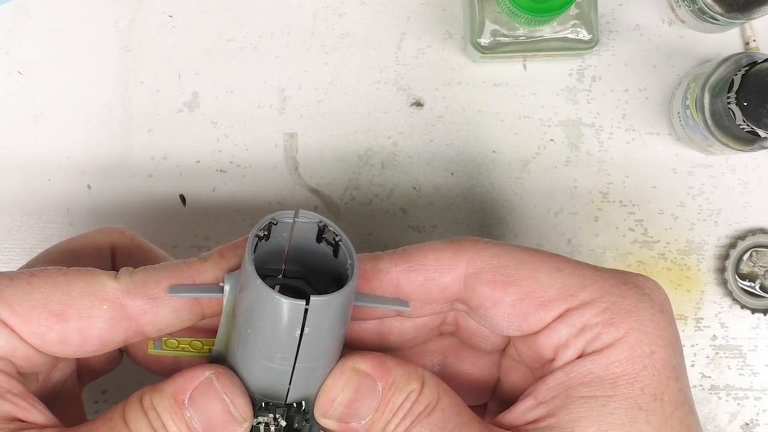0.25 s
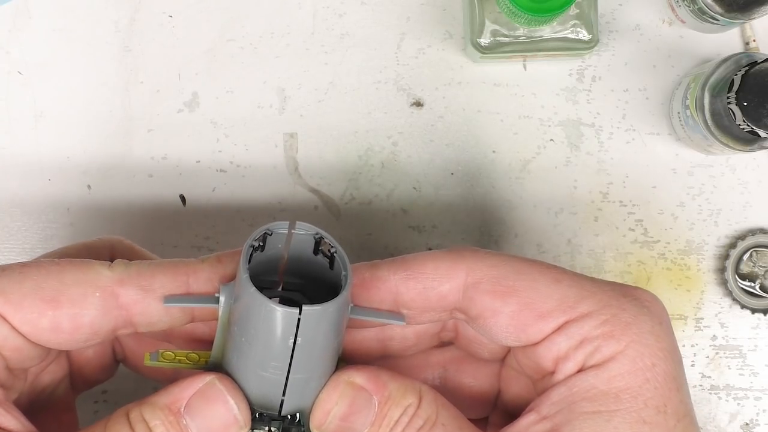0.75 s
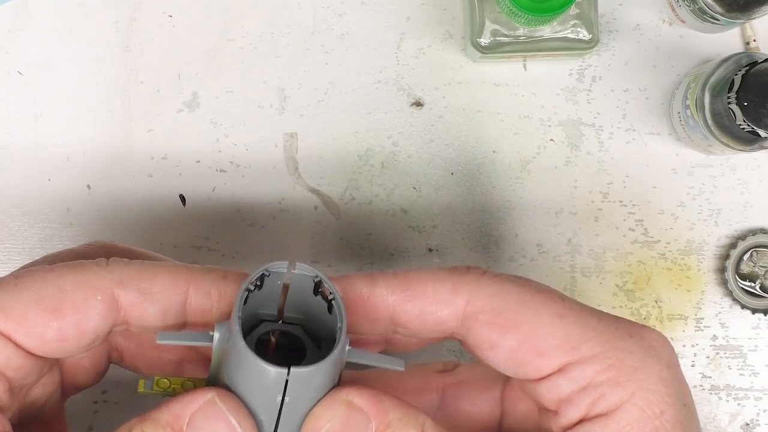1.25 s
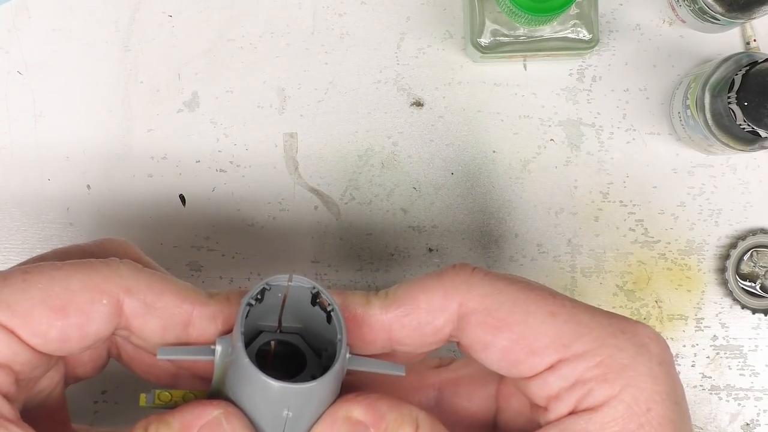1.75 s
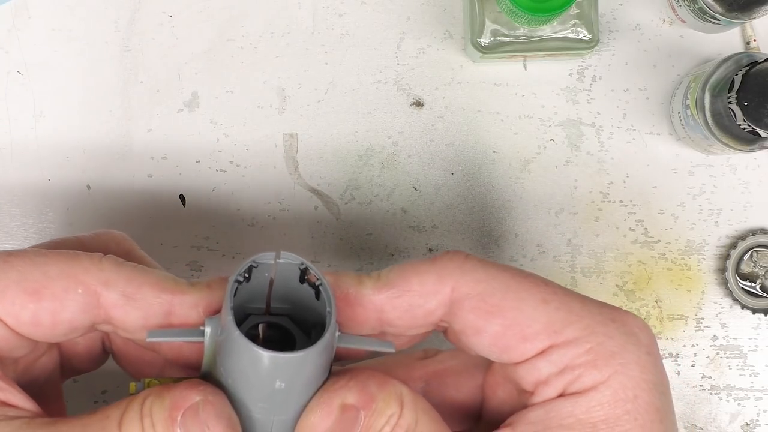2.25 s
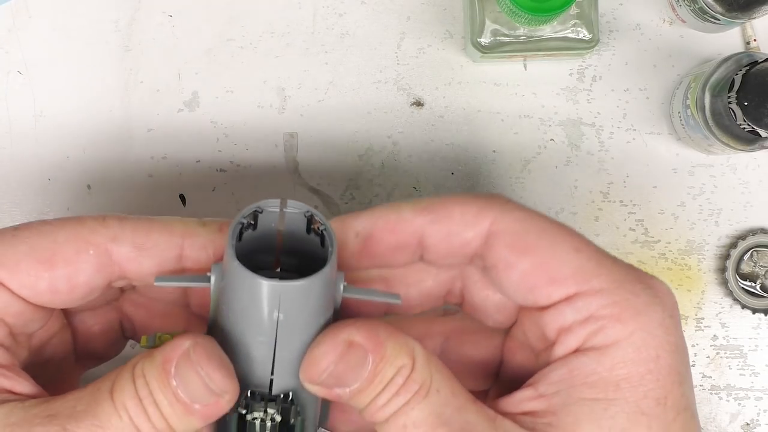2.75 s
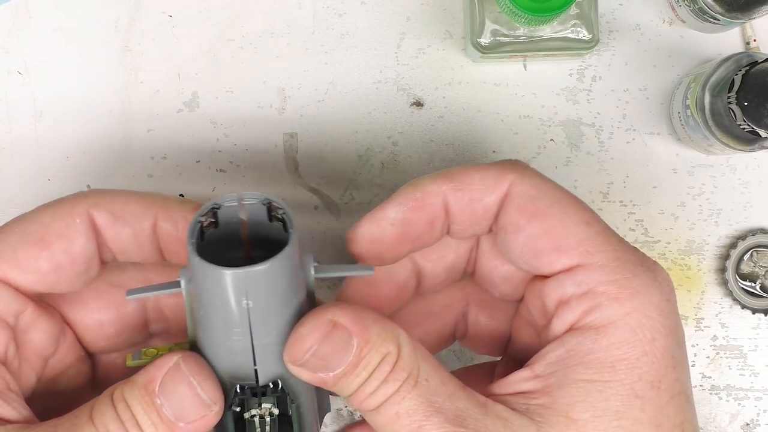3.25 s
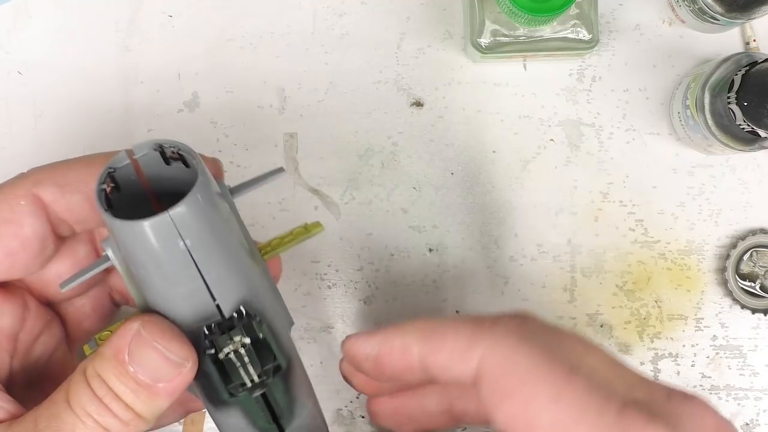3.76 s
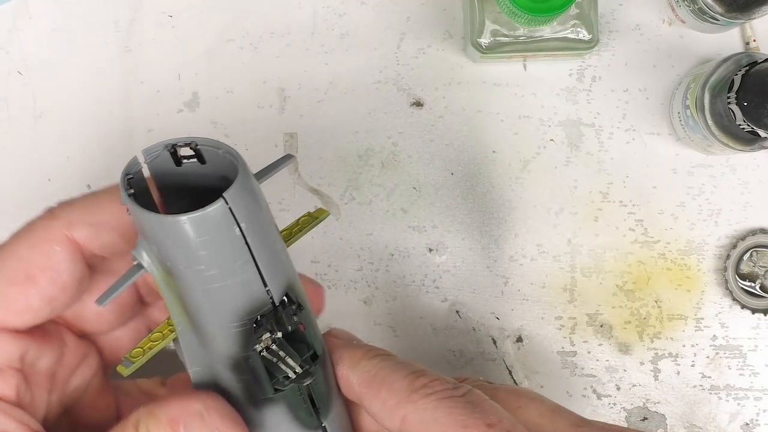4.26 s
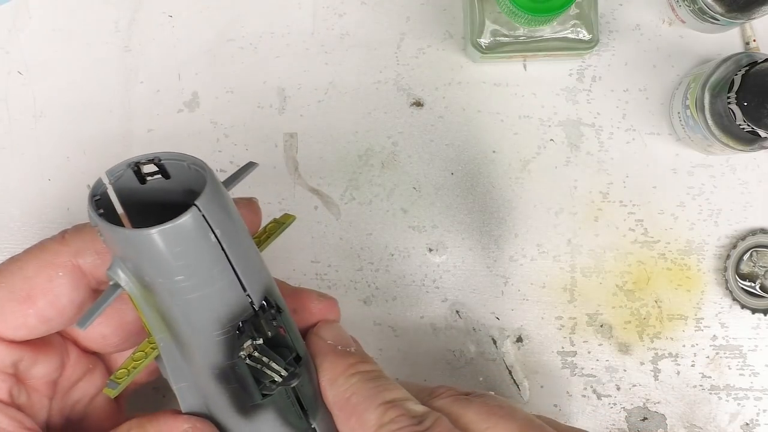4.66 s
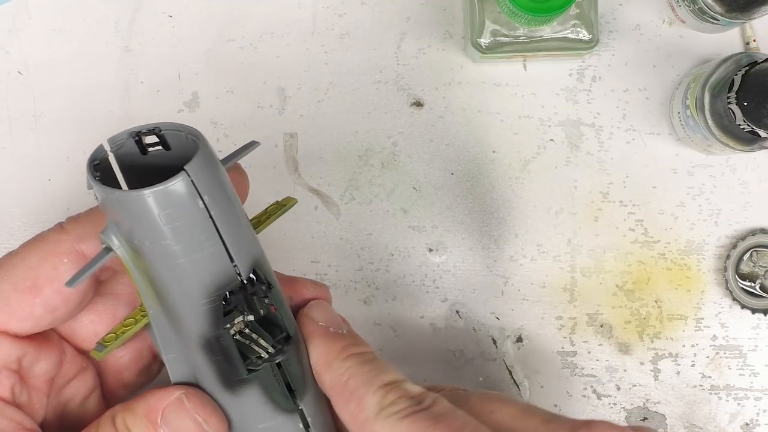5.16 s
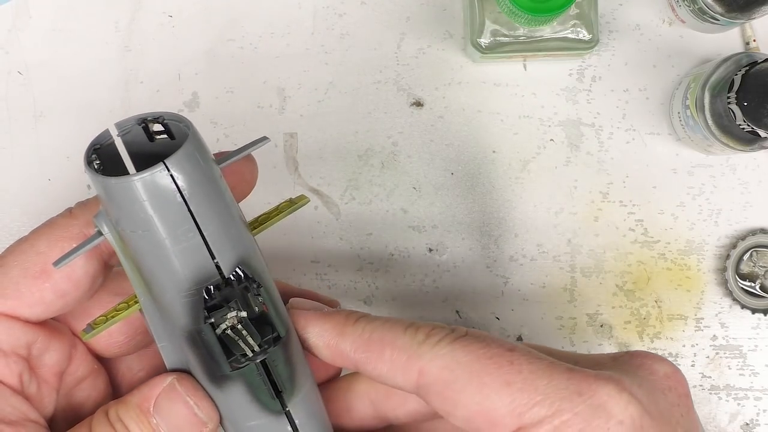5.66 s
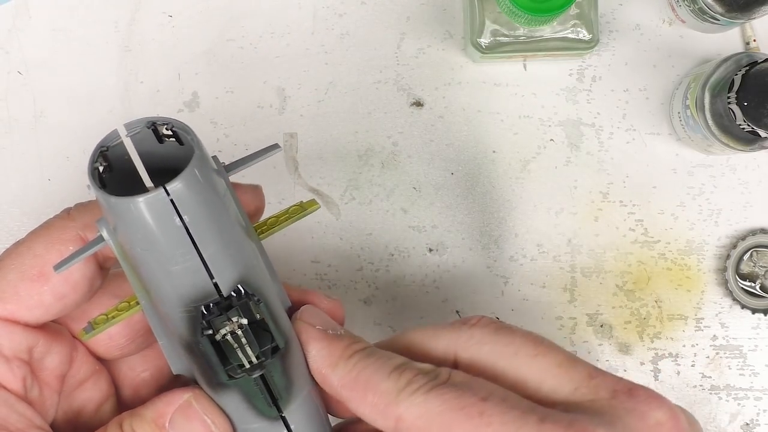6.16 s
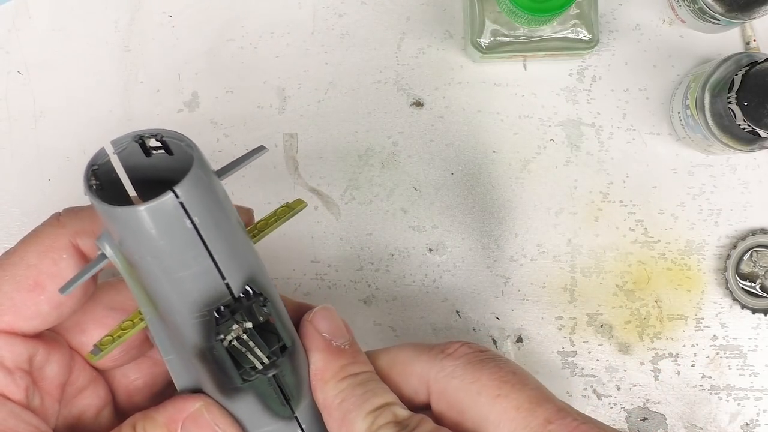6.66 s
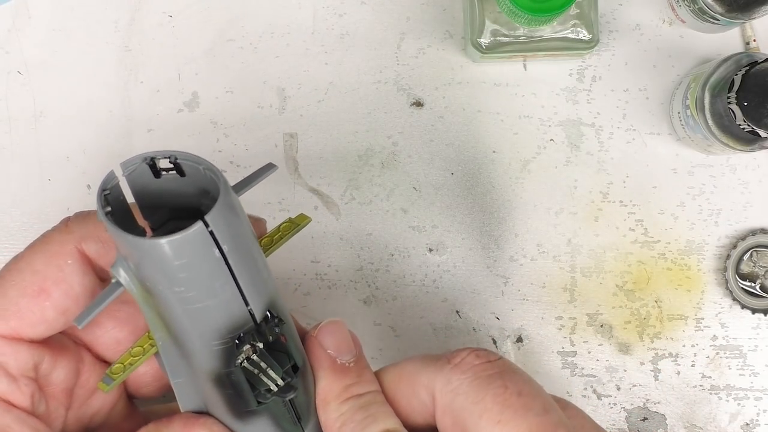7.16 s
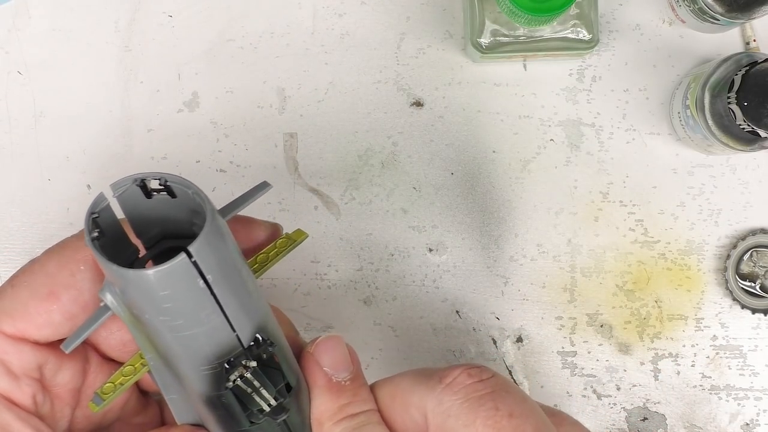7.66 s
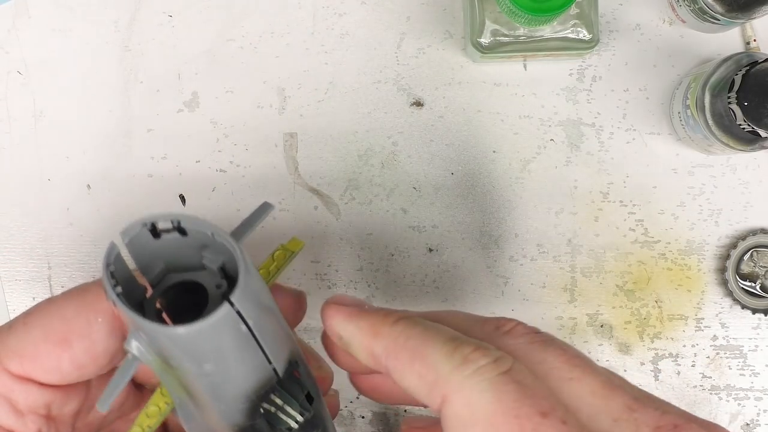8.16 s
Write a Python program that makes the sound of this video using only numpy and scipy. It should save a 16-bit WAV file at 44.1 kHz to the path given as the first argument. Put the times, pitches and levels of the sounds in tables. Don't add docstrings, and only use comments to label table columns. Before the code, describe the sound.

A hollow hard-plastic model shell is handled close to the microphone in a small, quiet room. From 0 to 1.4 seconds there are faint dry ticks and two short, breathy, grainy finger rubs around 0.95 and 1.2. A firm hollow snap lands at 1.5, a click at 1.9, then a quick cluster of ticks at 2.8-2.9. Light rubs and clicks follow around 3-3.5. At 4.2 a softer, brighter snap comes with two tiny high squeaks and skin friction. Sparse small ticks and faint rubs continue from 4.6 to 6.5. A weak snap at 6.9 precedes the loudest closing crack at 7.3, sharp and ringing with a short room tail. Clicks at 7.8-7.9 and a last rub at 8.4 end it. Behind runs a faint low hum, drifting tones, a thin whine, hiss and a distant rattling motor buzz that dips at 2.6 and 5.8 and fades briefly near 7.6.

```python
import sys
import numpy as np
from scipy import signal
from scipy.fft import rfft, irfft, next_fast_len
from scipy.io import wavfile
from scipy.ndimage import uniform_filter1d, map_coordinates

SR = 44100
rng = np.random.default_rng(int(sys.argv[2]) if len(sys.argv) > 2 else 0)


def unload_wav(signal):
    wavfile.write(
        sys.argv[1],
        SR,
        np.round(np.clip(np.atleast_2d(signal).T, -1, 1) * 32767).astype(np.int16),
    )


def linear_from_db(decibels):
    return 10 ** (np.asarray(decibels, float) / 20)


N = 370881
TIME_S = np.arange(N) / SR

# f/Hz, density/dB per Hz
SPREAD = [
    [(590, -46), (1000, -16), (1230, -13), (1300, -22), (1490, -8), (1780, -25), (1950, 1.5), (2650, -3),
     (3200, -4.5), (3810, -11), (5350, -9), (15000, -19)],
    [(500, -40), (900, -4), (2000, -1), (3700, -4), (5000, -16), (9000, -22), (15000, -20)],
    [(900, -28), (2600, 2), (4500, -9), (15000, -20)],
    [(470, -66), (800, -43), (998, -17), (1130, -14), (1290, -16), (1820, 0), (1980, -9.5), (2350, -3.5),
     (3010, -12.5), (4290, -10.5), (4850, -15.5), (8330, -16), (15000, -42)],
]


def unit(x):
    return x / np.sqrt(np.mean(x ** 2) + 1e-20)


def along(points, hz):
    f, v = np.transpose(points)
    return np.interp(np.log(hz + 1), np.log(f + 1), v)


def wobble(rate_hz):
    knots = rng.standard_normal(int(N * rate_hz / SR) + 4)
    return map_coordinates(knots, [np.arange(N) * rate_hz / SR])


def filtered(x, response):
    size = x.shape[-1]
    m = next_fast_len(size + 2048)
    return irfft(rfft(x, m) * response(np.fft.rfftfreq(m, 1 / SR)), m)[..., :size]


def coloured(spectrum, size=N):
    return unit(filtered(rng.standard_normal(size), lambda hz: linear_from_db(along(spectrum, hz))))


def wide(spectrum):
    # f/Hz, left-right correlation
    alike = [(30, .2), (60, 0.9), (110, 0.82), (290, 0.33), (640, 0.88), (1400, 0.22), (3100, 0.42),
             (5000, 0.24), (6900, 0.79), (9600, 0.72), (15000, 0.21)]

    def mid_side(hz):
        turn = np.arccos(np.clip(along(alike, hz), -1, 1)) / 2
        return linear_from_db(along(spectrum, hz)) * [np.cos(turn), np.sin(turn)]

    mid, side = filtered(rng.standard_normal((2, N)), mid_side)
    return unit(np.array([mid + side, mid - side]))


def add(track, s, sound, pan_db):
    part = track[:, max(round(s * SR), 0):][:, :len(sound)]
    part += linear_from_db([[pan_db / 2], [-pan_db / 2]]) * sound[:part.shape[1]]


def hiss():
    # f/Hz, density/dB per Hz
    hiss_spectrum = [(470, -51), (800, -14), (1100, -5), (1400, -6.5), (1700, -9), (2400, -9.5),
                     (3700, -14), (4700, -19.5), (6500, -28), (8000, -24.5), (11800, -18), (15600, -19.5)]
    return linear_from_db(-67 + 4.0) * wide(hiss_spectrum)


def whine():
    return linear_from_db(-83) * np.sin(2 * np.pi * 15704 * TIME_S)


def air_swell_db():
    # t/s, level/dB
    air = [(0.0, -62), (0.33, -59.5), (0.91, -62), (1.19, -61.5), (1.73, -60), (1.99, -63.5), (2.81, -61.5),
           (3.09, -62.5), (3.49, -61), (3.63, -63.5), (5.32, -61.5), (5.72, -62), (6.21, -64),
           (6.32, -63.5), (7.94, -60.5), (8.41, -55.5)]
    s, db = np.transpose(air)
    return np.interp(TIME_S, s, db) - np.mean(db)


def hum(swell_db):
    # f/Hz, density/dB per Hz
    hum_spectrum = [(25, -20.5), (60, -16.5), (82, -13), (100, -3), (120, -1.5), (145, -13.5), (180, -46)]
    level_db = -59.5 + 0.69 * swell_db - 0.5 * wobble(2.08)
    return linear_from_db(level_db) * wide(hum_spectrum)


def drone(swell_db):
    # f/Hz, density/dB per Hz
    drone_spectrum = [(88, -44), (150, -6.5), (221, -4), (252, -3), (338, -9.5), (406, -9.5), (445, -12),
                      (482, -7.5), (518, -18), (648, -22), (710, -12.5), (778, -19.5), (1700, -21),
                      (2210, -36), (3740, -120)]
    settle_s = 1
    early_db = 2 * np.exp(-(TIME_S / settle_s) ** 2)
    return linear_from_db(-62.5 + early_db + 0.84 * swell_db) * wide(drone_spectrum)


def far_tones():
    # start/s, end/s, f/Hz, level/dB
    tones = [(.2, 1.35, 238, -66.5), (0, 0.9, 400, -76), (0, 1.1, 499, -72), (.1, 1.1, 680, -79),
             (1.8, 8, 689, -86.5), (3, 7.2, 256, -72), (4.8, 7.2, 480, -75), (7.25, 8.15, 255, -64.5),
             (7.3, 8.7, 485, -71), (7.5, 9, 552, -76), (2.9, 4.04, 1325, -80), (5.7, 6.3, 1330, -79),
             (2.95, 3.4, 3600, -77), (8.1, 8.7, 256, -65)]
    out = np.zeros((2, N))
    sway = wobble(6.5)
    for start, end, hz, db in tones:
        t = np.arange(min(round((end - start) * SR), N)) / SR
        waver, swell = (np.roll(sway, rng.integers(N))[:len(t)] for _ in range(2))
        rise_s = t + 0.079 * (start == 0)
        fade = np.clip(np.minimum(rise_s, end - start - t) / 0.2, 0, 1)
        tone = np.sin(2 * np.pi * hz * t + 1.32 * waver)
        add(out, start, linear_from_db(db + 2.5 + 2.3 * swell) * fade * tone, pan_db=rng.uniform(-2.3, 4.3))
    return out


def buzz_level_db():
    # deepest/s, depth/dB, fall/s, recovery/s
    cut_outs = [
        (.85, 10, .03, .03),
        (2.64, 20, 0.021, 0.26),
        (5.8, 7, 0.025, 0.54),
        (7.6, 30, .28, 0.13),
    ]
    level_db = np.full(N, -64.5)
    for s, depth_db, fall_s, back_s in cut_outs:
        fall = np.clip(1 - (s - TIME_S) / fall_s, 0, 1)
        recovery = np.exp(-np.maximum(TIME_S - s, 0) / back_s)
        level_db -= depth_db * fall * recovery
    return level_db


def motor():
    # f/Hz, level/dB
    orders_db = [(1890, -6), (1949, 0), (2008, -1), (2067, -8), (2126, -5), (2186, -6), (2245, -5),
                 (2369, -10)]
    # f/Hz, density/dB per Hz
    casing = [(1600, -24.5), (1880, 1.5), (1970, 0.5), (2250, -2.5), (2400, -18), (2700, -32)]
    t = TIME_S + .00003 * wobble(4)
    orders = sum(linear_from_db(db) * np.exp(2j * np.pi * (hz * t + rng.random())) for hz, db in orders_db)
    orders = np.array([orders.real, (orders * np.exp(.9j)).real])
    return linear_from_db(buzz_level_db()) * unit(1.47 * unit(orders) + wide(casing))


def background():
    swell_db = air_swell_db()
    return hiss() + whine() + hum(swell_db) + drone(swell_db) + far_tones() + motor()


def room(x, wet_db):
    # f/Hz, t60/s
    decay = [(500, 0.38), (2000, 0.69), (5000, 0.49), (12000, 0.29)]
    size = SR // 2
    hz, t, z = signal.stft(rng.standard_normal((5, 2, size)), SR, nperseg=256)
    z = z * linear_from_db(-60 * t / along(decay, hz)[:, None])
    tails = signal.istft(z, SR, nperseg=256)[1][..., :size]
    tails = tails + .5 * tails[:, ::-1]
    tails = tails * np.clip(np.arange(size) / SR / 0.026 - .35, 0, 1)
    turn = np.arange(N) // (SR // 4) % len(tails)
    wet = np.zeros((2, N))
    for k, tail in enumerate(tails):
        part = (x * (turn == k))[None]
        wet += signal.fftconvolve(part, tail / np.linalg.norm(tail[0]), axes=1)[:, :N]
    return linear_from_db(wet_db) * wet


def rubs():
    # strongest/s, skin hiss/dB, rise/s, fall/s, shell modes over skin/dB
    strokes = [(0.948, -50.5, 0.028, 0.074, -6.5), (1.06, -75.5, 0.17, 0.33, 9.5),
               (1.189, -51, .018, 0.058, -3), (1.214, -66.5, 0.041, 0.04, -10.5),
               (3.02, -64, .035, .03, -2.5), (3.382, -60, 0.029, 0.014, -1), (3.544, -69, .022, .04, 0),
               (4.056, -68.5, 0.14, .08, 1.5), (4.168, -65, 0.027, 0.013, 11),
               (4.203, -66.5, 0.014, 0.029, 16), (4.307, -59.5, 0.1, 0.094, -2.5),
               (4.484, -72, .09, 0.27, 3), (4.562, -62, 0.17, 0.017, -9), (5.05, -69, 0.23, 0.17, 4.5),
               (5.208, -77, .045, 0.25, 4), (5.93, -72.5, 0.17, .2, 1.5), (6.056, -69, .03, 0.051, -3),
               (6.138, -73.5, 0.089, 0.1, 10), (6.98, -69.5, 0.13, 0.13, 5.5),
               (7.165, -75, 0.038, 0.032, 8), (7.905, -77.5, .012, 0.085, 11), (7.955, -67, 0.26, .07, -.6),
               (8.396, -54.5, 0.027, .04, -3.5)]
    # f/Hz, density/dB per Hz
    skin_hiss = [(4000, -17), (5500, -8.5), (8000, -5), (11000, -4), (13500, -12.5)]
    fine_hiss = [(10000, -44), (12000, -1), (16000, -7)]
    # f/Hz, density/dB per Hz
    low_mode = [(1200, -31), (1900, -3), (2450, -4), (2620, 3.5), (2800, -7), (3400, -13.5), (4000, -38)]
    high_mode = [(3000, -42), (3600, 1), (4000, -19.5), (4300, -6), (4600, -10.5), (5600, -22), (7000, -41)]
    # f/Hz, density/dB per Hz
    open_mode = [(1500, -27), (1950, -2.5), (2300, -7), (3500, -12), (3900, -3), (4080, -10), (4300, -1),
                 (5000, -20.5)]
    span_db = 20
    hold = 0.13
    closed_s = 1.3

    skin, hollow = np.zeros((2, N))
    for s, db, rise_s, fall_s, shell_db in strokes:
        before = (s - TIME_S) / rise_s
        after = np.maximum((TIME_S - s) / fall_s - hold, 0)
        stroke = linear_from_db(db - span_db * np.maximum(before, after))
        skin = skin + stroke
        hollow = hollow + linear_from_db(shell_db) * stroke
    shut = hollow * np.where(TIME_S < closed_s, .3, 1)
    layers = [(skin, skin_hiss), (linear_from_db(-9) * skin, fine_hiss),
              (shut, low_mode), (linear_from_db(-4.5) * shut, high_mode),
              (linear_from_db(5) * (hollow - shut), open_mode)]
    grain = linear_from_db(2.8 * wobble(1200) + 2.2 * wobble(60))
    rub = sum(level * unit(grain * coloured(colour)) for level, colour in layers)
    return rub * linear_from_db([[.6], [-.6]])


def squeaks():
    # t/s, length/s, f/Hz, level/dB
    chirps = [
        (3.298, .03, 6400, -69),
        (4.182, 0.031, 7550, -49),
        (4.208, 0.022, 7620, -47),
        (5.067, .05, 11800, -68),
        (7.165, .03, 11800, -68),
    ]
    out = np.zeros((2, N))
    for s, length_s, hz, db in chirps:
        t = np.arange(-length_s * SR, length_s * SR) / SR
        waver = uniform_filter1d(rng.standard_normal(SR // 4), size=60)[:len(t)]
        phase = 2 * np.pi * np.cumsum(hz * (1 + 0.12 * waver)) / SR
        swell = np.exp(-(2 * t / length_s) ** 2)
        add(out, s - length_s, linear_from_db(db) * swell * np.sin(phase), pan_db=1)
    return out


def slip(shell, bright_db, dull_db, damping):
    # f/Hz, density/dB per Hz
    crack = [(200, -38), (900, -20), (1500, -4.5), (2500, -1.5), (4200, -10.5), (6000, -40)]
    edge = [(4000, -20.5), (5500, -5), (8000, -2), (11000, -4), (15500, -15)]
    t = np.arange(SR // 25) / SR
    ring = np.zeros(len(t))
    for k, (hz, width_hz, db) in enumerate(shell):
        mode = np.sin(2 * np.pi * hz * t + 0.22 * k * k)
        ring += (-1) ** k * linear_from_db(db - damping * width_hz * t) * mode
    dull = linear_from_db(dull_db - 60 * t / 0.046) * coloured(crack, size=len(t))
    bright = 0.65 * linear_from_db(bright_db - 60 * t / 0.028) * coloured(edge, size=len(t))
    onset = 1 - np.exp(-t / 0.00046)
    return (ring / np.max(np.abs(ring)) + dull + bright) * onset


def room_blow(blow, colour):
    return filtered(blow, lambda hz: linear_from_db(along(colour, hz)))


def ticks():
    # t/s, peak/dB, brightness/dB, shell pitch f/Hz
    small_slips = [(0.0692, -49, -22, 1950), (0.53, -50.5, -9, 2090), (0.7007, -52.5, -3, 2000),
                   (0.869, -41, -10.5, 1950), (0.8994, -46.5, -21, 1950), (1.044, -47, -4, 2120),
                   (1.18, -44, -23, 4340), (1.365, -46.5, -9, 1950), (1.9119, -38, -13, 1950),
                   (2.2308, -65, -27, 1940), (2.772, -40, -13, 1990), (2.805, -49, -6, 2010),
                   (2.823, -53, -1, 1970), (2.8634, -44, -4, 1900), (2.892, -37.5, -8, 2020),
                   (2.954, -52, -20, 2350), (3.4261, -47.5, -9, 2110), (3.4449, -42.5, -24, 2000),
                   (3.4984, -48.5, -19, 2050), (4.6494, -51.5, -6, 1960), (4.9896, -46.5, -11, 2090),
                   (5.388, -45, -9.5, 2000), (5.6888, -49, -18, 1960), (5.7632, -46, -13, 1970),
                   (5.9383, -53, -3, 1900), (6.0546, -49.5, -1.5, 2180), (6.4433, -45, -18, 1800),
                   (7.7673, -41.5, -8.5, 1450), (7.8846, -37.5, -4, 1720), (7.9344, -53, -20, 1840)]
    near, blow = np.zeros((2, N)), np.zeros(N)
    for s, db, bright_db, hz in small_slips:
        shell = [(hz, 110, 0),
                 (hz * rng.uniform(1.3, 1.36), 200, -3),
                 (rng.uniform(3660, 4870), 200, -7)]
        for late_s, step_db in [(-.003, -14), (-.0005, -0.5), (.004, -8.5)]:
            click = slip(shell, bright_db, dull_db=-12.0, damping=24)
            add(near, s + late_s, linear_from_db(db + step_db) * click, pan_db=2.5)
        blow[round(s * SR)] = linear_from_db(db + 29.5)
    return near, room_blow(blow, SPREAD[-1])


def snaps():
    # brightness/dB, dull crack/dB, room send/dB
    mixes = [
        (-10, -17.5, -17.5),
        (-13.5, -11, -27),
        (-8.5, -11.5, -40),
        (-13, -19, -5.5),
    ]
    # f/Hz, width/Hz, level/dB
    shells = [
        [(2000, 120, -5.5), (2475, 180, -5), (2674, 48, -5), (2960, 130, -4.5), (4300, 260, -4.5),
         (5230, 120, -17), (6680, 110, -22)],
        [(447, 63, -21), (1044, 62, -10), (1270, 110, -2.5), (1950, 130, 3), (2600, 110, 6), (2960, 120, -19),
         (3500, 230, 3), (4660, 140, 1.5), (4950, 120, -5)],
        [(1870, 75, -1), (2570, 190, 2), (3320, 160, 2), (4930, 140, -9), (5300, 150, -18), (6230, 110, -31)],
        [(336, 85, -35.5), (685, 120, -36), (1460, 150, -6.5), (1816, 105, 0.5), (2266, 130, -1.5),
         (2630, 110, -5), (3080, 140, -3.5), (3490, 120, -8.5), (4260, 145, -9), (5050, 79, -17),
         (1286, 130, -15)],
    ]
    # t/s, level/dB
    slips = [
        [(1.5262, -20.5), (1.5293, -11.5), (1.5362, -22.5)],
        [(4.1745, -43), (4.1764, -21), (4.1812, -26)],
        [(6.9255, -42), (6.9366, -30.5), (6.9395, -38)],
        [(7.3252, -18), (7.3278, -1), (7.3325, -15)],
    ]
    near, far = np.zeros((2, N)), np.zeros(N)
    for steps, (bright_db, dull_db, room_db), shell, colour in zip(slips, mixes, shells, SPREAD):
        for s, db in steps:
            add(near, s, linear_from_db(db) * slip(shell, bright_db, dull_db, damping=18.4), pan_db=2.1)
        blow = np.zeros(N)
        blow[round(steps[1][0] * SR)] = linear_from_db(room_db + 26.5)
        far += room_blow(blow, colour)
    return near, far


def scene():
    behind = background()
    touch = rubs() + squeaks()
    tick_near, tick_far = ticks()
    snap_near, snap_far = snaps()
    near = tick_near + snap_near
    feed = tick_far + snap_far + .55 * touch.mean(axis=0) + 0.2 * near.mean(axis=0)
    return near + touch + room(feed, wet_db=-17) + behind


def low_pass(x):
    return signal.sosfilt(signal.butter(12, 16450, fs=SR, output="sos"), x)


def record(dry):
    top_hz = 16000
    mix = filtered(dry, lambda hz: 1 / (1 + (hz / top_hz) ** 120))
    return low_pass(mix)


dry = scene()
out = record(dry)
unload_wav(out)
```